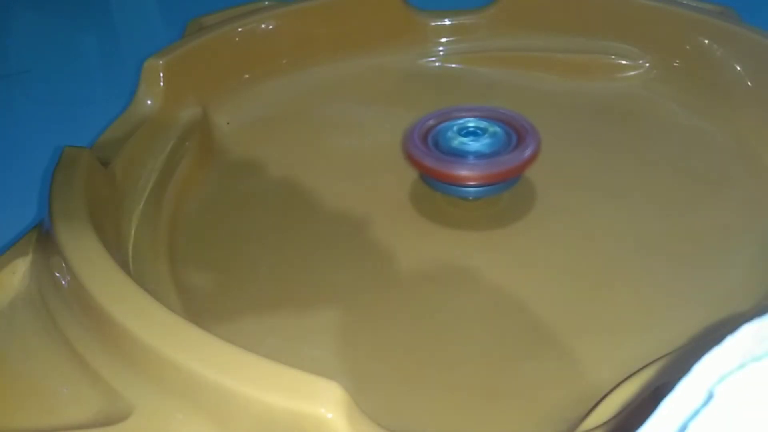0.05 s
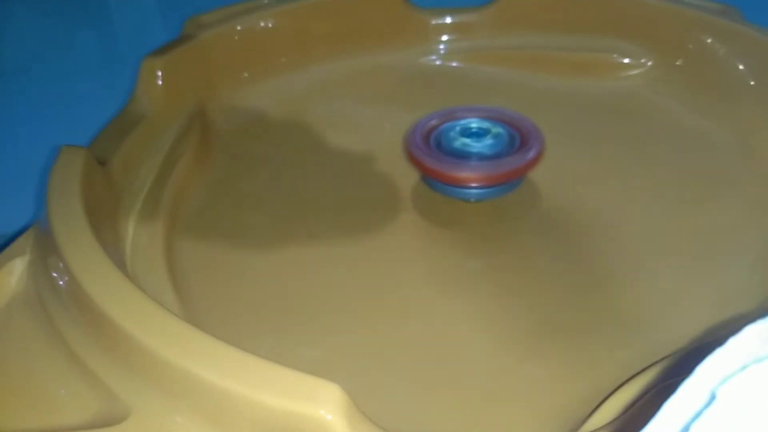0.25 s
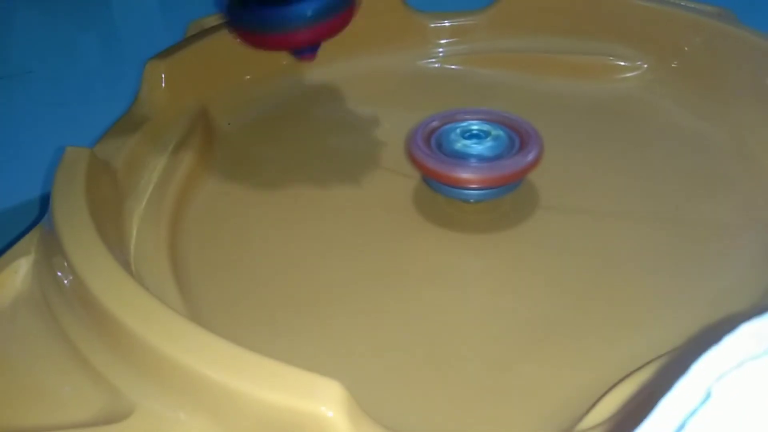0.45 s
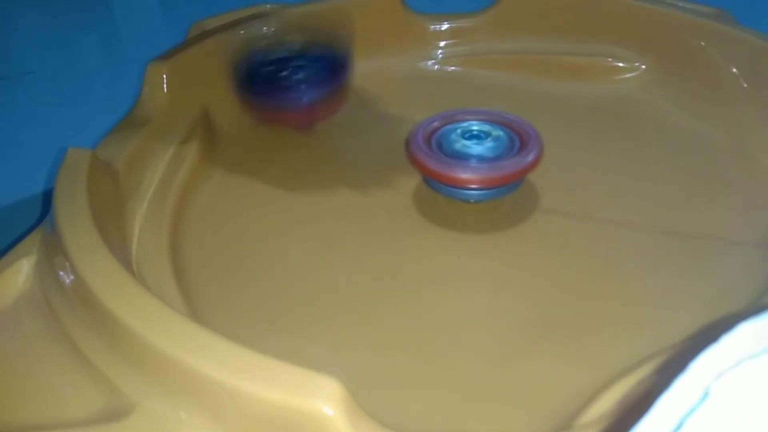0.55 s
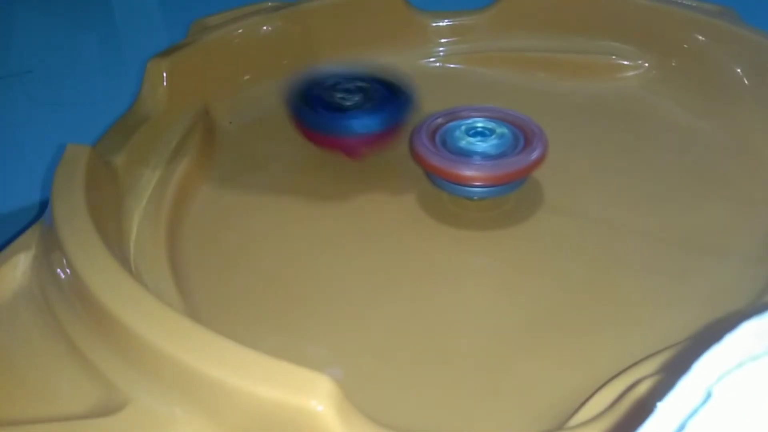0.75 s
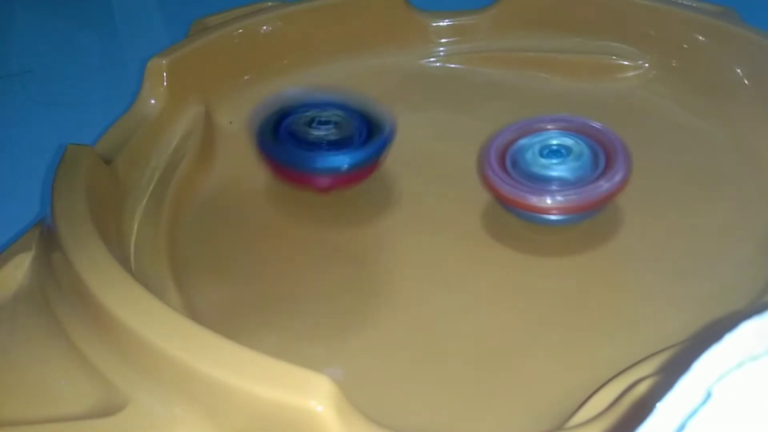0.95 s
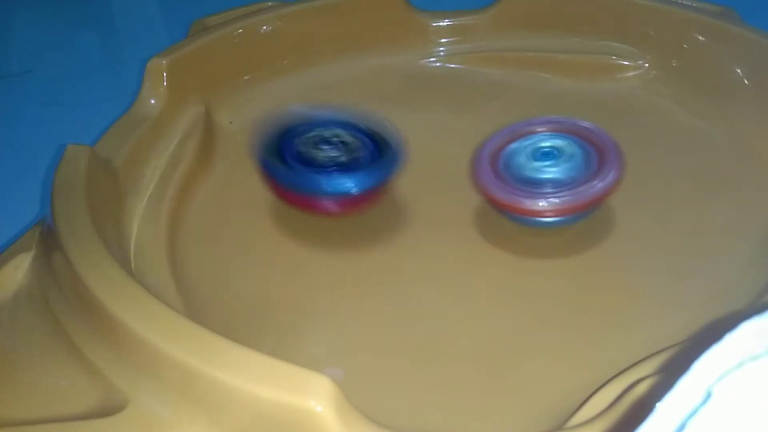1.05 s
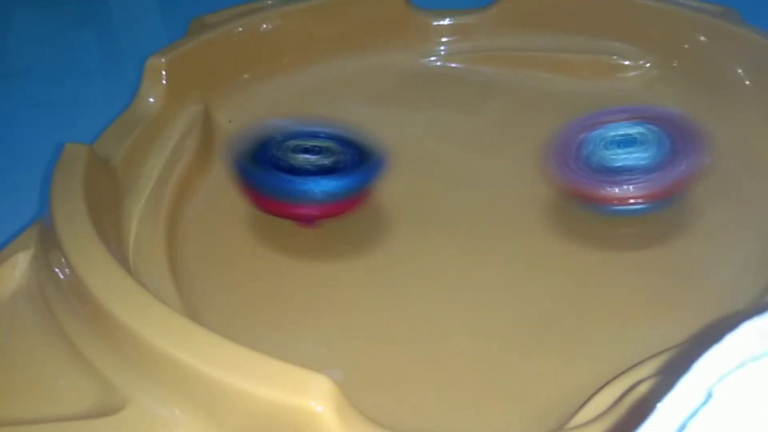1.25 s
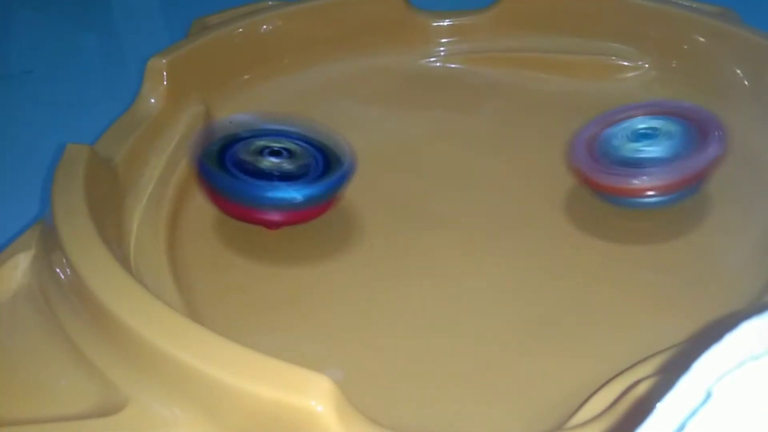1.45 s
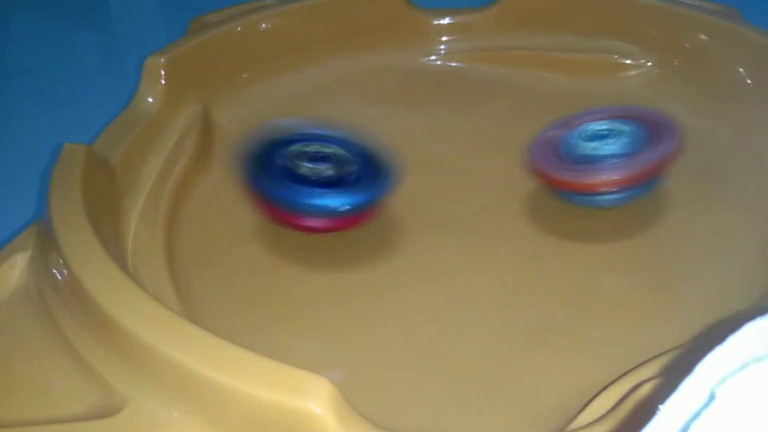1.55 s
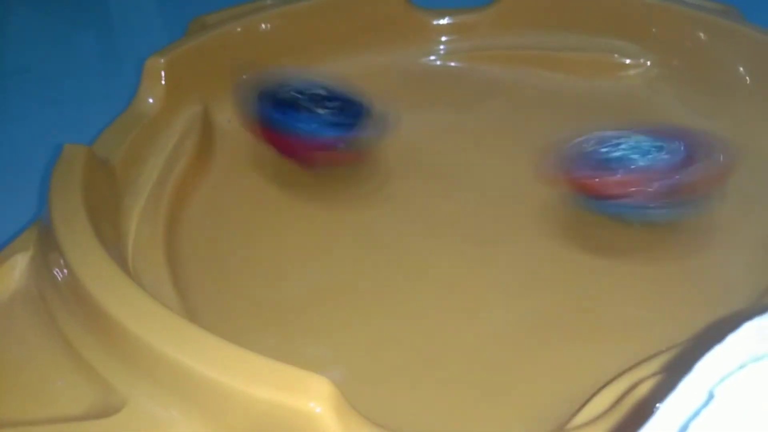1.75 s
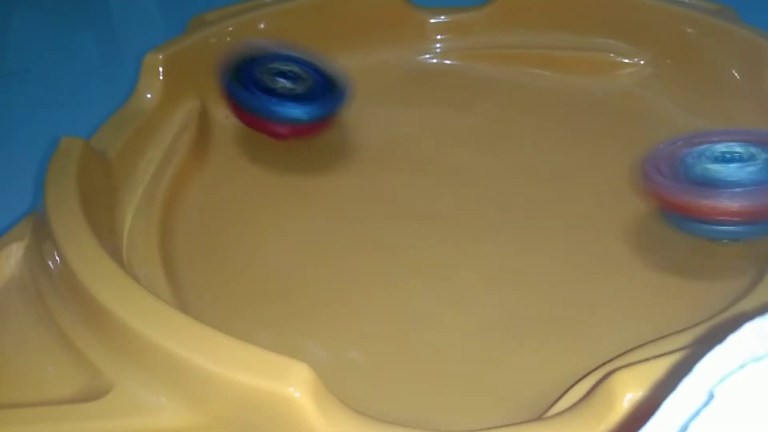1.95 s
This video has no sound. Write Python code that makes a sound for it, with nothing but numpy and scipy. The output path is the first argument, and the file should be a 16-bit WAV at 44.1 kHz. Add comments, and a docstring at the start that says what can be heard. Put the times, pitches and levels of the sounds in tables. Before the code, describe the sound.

Spinning tops clash in a plastic stadium after a ripcord whirr, with sharp metallic cracks and clatter

```python
"""A faint skitter, then the rising whirr of a ripcord that lets go of the second of two spinning tops.
It drops into a thin plastic stadium in a small live room and bounces: struck modes of shell, wall and bowl.
The tips skitter as noise pulsed once a turn; the metal rims clash three times as bursts with room echoes,
and the last two clashes leave a rim ringing in decaying modes. Then the struck top grazes the floor in
short rising scrapes and a top clatters against the plastic wall."""
import sys
import numpy as np
from scipy import signal
from scipy.fft import rfft, irfft
from scipy.io import wavfile
from scipy.ndimage import map_coordinates

SR = 44100
rng = np.random.default_rng(int(sys.argv[2]) if len(sys.argv) > 2 else 0)


def dump(signal):
    """Clip the signal to [-1, 1] and save it as 16-bit WAV at the path in sys.argv[1]."""
    limited = np.clip(np.atleast_2d(signal).T, -1, 1)
    pcm = np.round(limited * 32767).astype(np.int16)
    wavfile.write(sys.argv[1], SR, pcm)


N = 88200

# Background noise spectrum. Each row: frequency in Hz, level in dB.
BACKGROUND = [(30, 2), (150, -10), (1000, -27), (8000, 8), (15000, -15)]
BACKGROUND_DB = -65.5

# Tips on the floor. Each row: time in seconds, hiss level in dB, rumble level in dB.
SKITTER_LEVELS = [(0, -52.5, -88), (.07, -58, -93), (.38, -53, -52.5), (.53, -43, -45), (.72, -40, -46.5),
                  (.95, -44, -52.5), (1.1, -48.5, -44.5), (1.24, -65, -60), (1.28, -58, -52),
                  (1.5, -53, -48), (1.7, -48, -32.5), (1.84, -61, -49), (2, -54.5, -46)]
# Spectrum of the scraping tips. Each row: frequency in Hz, level in dB.
HISS_SPECTRUM = [(530, -47), (900, -49), (1180, -12), (1440, -12), (1780, -2), (2080, -4), (3320, 3),
                 (3870, 1), (7400, 1), (15000, -31.5)]
# Spectrum of the rumbling bowl. Each row: frequency in Hz, level in dB.
RUMBLE_SPECTRUM = [(24, -59), (40, -19.5), (124, 1.5), (302, -10.5), (443, -5), (650, -7.5), (907, -9),
                   (1170, -13), (1420, -12.5), (1800, -22.5), (3000, -94)]
# Level of the thin whine. Each row: time in seconds, level in dB.
WHINE_LEVELS = [(.03, -67), (.3, -60), (.42, -46), (.55, -62), (1.2, -78), (1.7, -70), (1.83, -63),
                (1.92, -76)]
SPIN_HZ, SPIN_SAG_HZ_PER_S, WHINE_HZ = 63, 4.06, 8460

# The pull of the ripcord. Each row: time in seconds, level in dB.
PULL_LEVELS = [(0, -100), (.075, -65.5), (.132, -38.5), (.236, -27), (.31, -28.5), (.38, -41), (.44, -39),
               (.5, -79)]
# Spectrum of the ripcord's rasp. Each row: frequency in Hz, level in dB.
RASP_SPECTRUM = [(120, -61), (314, -32.5), (700, -22), (1130, -11.5), (2060, -13), (2380, -4),
                 (4890, -10.5), (7420, -8.5), (15000, -45.5)]
# Pitch of the gear teeth as the cord speeds up. Each row: time in seconds, pitch in Hz.
GEAR_PITCH_CURVE = [(.05, 800), (.13, 1130), (.15, 1355), (.175, 1640), (.22, 2310), (.26, 2420),
                    (.4, 2360)]
# Resonances of the launcher's housing. Each row: frequency in Hz, level in dB.
HOUSING_MODES = [(1200, -8), (1690, -4), (2380, -0.5), (2800, -14), (3040, 4.5), (3800, 0.5)]
GEAR_LOUDEST_S, GEAR_SWELL_S = 0.17, 0.05

# Light plastic clicks of the launcher and the tips. Each row: start in seconds, level in dB.
CLICK_EVENTS = [(0.316, -14), (0.334, -18), (0.3518, -17), (.392, -18.5), (0.41, -24), (0.4838, -27),
                (0.491, -27.5), (0.705, -26.5), (0.8048, -33.5), (1.081, -28.5), (1.096, -27),
                (1.1541, -34), (1.26, -43.5), (1.275, -43), (1.3107, -46), (1.324, -39), (1.378, -38.5),
                (1.4274, -41.5), (1.461, -41.5), (1.5091, -36.5), (1.758, -38), (1.817, -42.5),
                (1.869, -45), (1.98, -47)]
# Spectrum of a click. Each row: frequency in Hz, level in dB.
CLICK_SPECTRUM = [(290, -69), (500, -34), (990, -14), (2070, -6), (2880, -1.5), (5230, -0.5), (5860, 0.5),
                  (8250, -2.5), (15000, -32)]

# A top strikes the stadium. Each row: start in seconds, shell level, clack level and thud level in dB.
KNOCK_EVENTS = [(0.384, -34.5, -23, -37), (0.39, -13, -26, -32), (0.41, -17.5, -35, -39.5),
                (0.423, -25, -34, -26.5), (0.483, -26.5, -31.5, -34), (0.4926, -22, -23.5, -44),
                (0.506, -29.5, -27, -22.5), (1.604, -31, -35, -32), (1.622, -50, -35, -47),
                (1.6552, -28, -14.5, -51), (1.664, -30.5, -15, -30), (1.6693, -31.5, -21.5, -34)]
# Modes of the thin shell. Each row: frequency in Hz, level in dB, t60 in seconds.
SHELL_MODES = [(206, -11.5, 0.12), (277.1, 0.5, 0.28), (332.7, -13.5, 0.33), (419.3, -3.5, 0.2),
               (458.5, -16, 0.33), (512.5, -5.5, 0.3), (539, -6, 0.21), (596.6, -0.5, 0.15),
               (654, -9.5, .17), (780, -3, 0.091), (911, -6, 0.14)]
# Spectrum of the shell's mass of short modes. Each row: frequency in Hz, level in dB.
SHELL_NOISE_SPECTRUM = [(40, -29), (150, 6.5), (500, 2.5), (900, -4.5), (1300, -9.5), (3000, -26.5),
                        (9000, -70)]
# Spectrum of a clack. Each row: frequency in Hz, level in dB.
CLACK_SPECTRUM = [(180, -67), (300, 1.5), (775, -4), (1000, -9), (1570, 5), (2200, -6), (2900, -5),
                  (4540, -8), (6070, -16.5), (7600, -8.5), (14000, -40)]
# Modes of the stiff stadium wall. Each row: frequency in Hz, level in dB, t60 in seconds.
WALL_MODES = [(327, -8.5, 0.37), (542.2, -12, 0.14), (785, 0, 0.088), (1555, -11, 0.13), (1786, -12, 0.073),
              (2594, -3.5, 0.064)]
# Modes of the whole bowl flexing. Each row: frequency in Hz, level in dB, t60 in seconds.
BOWL_MODES = [(92, -9, .2), (139, -2.5, .32)]

# Rim against rim. Each row: start in seconds, crack level in dB, crack t60 in seconds, room level in dB,
# stadium level in dB, thump level in dB, settled floor tone in Hz, floor tone level in dB.
CLASH_EVENTS = [(0.6106, -8, 0.057, -19.5, -36.5, -51, 790, -31),
                (0.974, -5, 0.012, -14, -27.5, -16, 576, -11.5),
                (1.524, -5.5, 0.032, -14, -27, -23, 795, -12.5)]
# Spectrum of the crack of the rims. Each row: frequency in Hz, level in dB.
CRACK_SPECTRUM = [(180, -31), (300, -38), (663, -11), (3870, -11), (4490, -1), (6360, -7), (7880, 6),
                  (9600, -7.5), (12300, -13), (15500, -25)]
# Spectrum of a tip slamming into the floor. Each row: frequency in Hz, level in dB.
SMACK_SPECTRUM = [(100, 7.5), (1000, -1.5), (7000, -17), (15000, -10)]
# Spectrum of the room's answer to a clash. Each row: frequency in Hz, level in dB.
CLASH_ROOM_SPECTRUM = [(200, -14), (800, -7), (1090, -18.5), (3950, -13), (4550, -3), (5060, -12.5),
                       (5980, -5), (8550, 2.5), (15500, -29.5)]
# First reflections of a clash from nearby walls. Each row: delay in seconds, level in dB.
WALL_REFLECTIONS = [(0.018, -5.5), (0.033, -2.5)]
ROOM_T60_S, ROOM_DELAY_S, ROOM_RISE_S = 0.24, 0.011, 0.0044

# Modes of the metal rim as the second clash sets it ringing. Each row: frequency in Hz, level in dB, t60 in
# seconds.
RIM_A_MODES = [(4226, -30, .4), (4355, -35, .3), (4581, -20.5, .28), (4646, -31, .4), (4700, -30, .3),
               (8080, -26, .25), (8220, -26, .24), (11990, -49, .55), (12360, -41, .58)]
# The same rim's modes, weighted differently, as the third clash sets it ringing. Each row: frequency in Hz,
# level in dB, t60 in seconds.
RIM_B_MODES = [(4240, -26, .34), (4344, -30.5, .5), (7628, -29, .28), (8436, -29, .34), (8730, -22, .18)]
RIM_BLUR = 0.1  # phase wander in radians

# A tilted top grazes the floor. Each row: centre in seconds, level in dB, pitch at the centre in Hz.
GRAZE_EVENTS = [(1.284, -51.5, 1440), (1.284, -48.5, 474), (1.281, -46, 880), (1.338, -46, 898),
                (1.381, -51, 2310), (1.384, -47.5, 960), (1.422, -49, 1433), (1.421, -48, 454.4),
                (1.602, -40, 1464), (1.628, -35, 1370)]
BAND_LIMIT_HZ = 15700


def amp(db):
    """Level law: decibels to an amplitude ratio."""
    return 10 ** (np.asarray(db) / 20)


def unit(x):
    """Normalisation of power: scale to rms 1."""
    return x / np.sqrt(np.mean(x ** 2) + 1e-20)


def clock():
    """Uniform sampling: the time of each sample in seconds."""
    return np.arange(N) / SR


def curves(rows):
    """Linear interpolation: one value per sample for each column after the time."""
    times, *columns = np.transpose(rows)
    return [np.interp(clock(), times, column) for column in columns]


def wobble(knots_per_s):
    """Band-limited fluctuation: a smooth random curve through knots at the given rate."""
    return map_coordinates(rng.standard_normal(N // 8), [clock() * knots_per_s], mode="wrap")


def colour(x, spectrum):
    """Linear filtering: weight the spectrum of x, interpolated on log frequency, at rms 1."""
    hz, db = np.transpose(spectrum)
    bins_hz = np.fft.rfftfreq(N, 1 / SR)
    gain = amp(np.interp(np.log(bins_hz + 1), np.log(hz), db))
    return unit(irfft(rfft(x) * gain, N))


def noise(spectrum):
    """Stationary random sound: white noise coloured by a spectrum."""
    return colour(rng.standard_normal(N), spectrum)


def burst(spectrum, envelope):
    """Transient noise: coloured after its envelope so that its edges stay within the spectrum."""
    raw = rng.standard_normal(N) * envelope
    return colour(raw, spectrum) * np.sqrt(np.mean(envelope ** 2))


def fade(start, t60, rise):
    """Damped response to a blow: quick rise, then exponential decay of 60 dB in t60 seconds."""
    t = np.maximum(clock() - start, 0)
    return (1 - np.exp(-t / rise)) * 1000 ** (-t / t60)


def ring(modes, start, rise, blur):
    """Modal superposition: decaying sines whose phases wander slightly."""
    out = np.zeros(N)
    for hz, db, t60 in modes:
        phase = 2 * np.pi * (hz * clock() + rng.random()) + blur * wobble(60)
        out += amp(db) * fade(start, t60, rise) * np.sin(phase)
    return out


def sing(hz, drift_per_s):
    """Friction-driven resonance: a carrier, fixed or moving, under two random quadrature envelopes."""
    phase = 2 * np.pi * np.cumsum(hz * np.ones(N)) / SR
    return unit(wobble(drift_per_s) * np.sin(phase) + wobble(drift_per_s) * np.cos(phase))


def glide(start, from_hz, to_hz, settle_s):
    """Exponential relaxation of pitch: a sine slides from one frequency and settles on another."""
    t = np.maximum(clock() - start, 0)
    slide_cycles = (from_hz - to_hz) * settle_s * (1 - np.exp(-t / settle_s))
    return np.sin(2 * np.pi * (to_hz * t + slide_cycles))


def echo(start, spectrum):
    """Diffuse reverberation: the room answers a short blow with delayed, decaying noise."""
    return noise(spectrum) * fade(start + ROOM_DELAY_S, ROOM_T60_S, ROOM_RISE_S)


def background():
    """Stationary random sound: a steady faint noise under the scene."""
    return amp(BACKGROUND_DB) * noise(BACKGROUND)


def turns(rate_hz, sharp):
    """Periodic modulation: one bump for each turn, at rms 1."""
    return unit(np.exp(sharp * np.cos(2 * np.pi * np.cumsum(rate_hz) / SR)))


def skitter(modes_db=-6, drift_per_s=28):
    """Rotating friction: tips scrape once a turn and keep the bowl rumbling, with a thin whine."""
    hiss_db, rumble_db = curves(SKITTER_LEVELS)
    whine_db, = curves(WHINE_LEVELS)
    spin_hz = (SPIN_HZ - SPIN_SAG_HZ_PER_S * clock()) * (1 + 0.12 * wobble(29.9))
    sway_db = 1.1 * wobble(35.09)  # shared by hiss and rumble
    hiss_level = amp(hiss_db + sway_db + 0.71 * wobble(600))
    hiss = noise(HISS_SPECTRUM) * turns(spin_hz, sharp=0.38) * hiss_level
    # Halved dB levels even out the shell modes under steady friction.
    hum = unit(sum(amp(db / 2) * sing(hz, drift_per_s) for hz, db, t60 in SHELL_MODES))
    rumble = unit(noise(RUMBLE_SPECTRUM) + amp(modes_db) * hum) * amp(rumble_db + sway_db)
    whine = amp(whine_db) * sing(WHINE_HZ * (1 + 0.0055 * wobble(8)), drift_per_s=40)
    return hiss + rumble + whine


def launcher(gear_db=-10, housing_db=-8):
    """Gear meshing and resonance: the cord rasps through the housing as the gear whirrs up in pitch."""
    level_db, = curves(PULL_LEVELS)
    pitch_hz, = curves(GEAR_PITCH_CURVE)
    swell = np.exp(-((clock() - GEAR_LOUDEST_S) / GEAR_SWELL_S) ** 2)
    gear = amp(gear_db) * sing(pitch_hz, drift_per_s=220) * swell
    housing = unit(sum(amp(db) * sing(hz, drift_per_s=58.3) for hz, db in HOUSING_MODES))
    rasp = unit(burst(RASP_SPECTRUM, amp(1.6 * wobble(900))))
    whirr = unit(rasp + gear + amp(housing_db) * housing)
    return amp(level_db + 1.5 * wobble(88.7)) * whirr


def clicks(t60=0.028, room_db=-13):
    """Impulsive contact: small dry snaps of plastic with a little room."""
    out = np.zeros(N)
    for start, db in CLICK_EVENTS:
        snap = burst(CLICK_SPECTRUM, fade(start, t60, 0.00026))
        room = echo(start - 0.008, CLICK_SPECTRUM)  # shortens the room delay
        out += amp(db) * (snap + amp(room_db) * room)
    return out


def shell(start, modes_db=-4, boom_db=-1, boom_t60=0.22):
    """Modal density: the thin bowl booms in clear modes over a mass of short ones."""
    modes = ring(SHELL_MODES, start, rise=0.00022, blur=0.74)
    boom = noise(SHELL_NOISE_SPECTRUM) * fade(start, boom_t60, 0.00027)
    return amp(modes_db) * modes + amp(boom_db) * boom


def knocks(clack_t60=0.041, room_db=-16, wall_db=-5):
    """Impact excitation: a top lands, bounces or hits the wall, rousing shell, wall and bowl."""
    out = np.zeros(N)
    for start, shell_db, clack_db, thud_db in KNOCK_EVENTS:
        clack = noise(CLACK_SPECTRUM) * fade(start, clack_t60, 0.00023)
        clack += amp(room_db) * echo(start, CLACK_SPECTRUM)
        clack += amp(wall_db) * ring(WALL_MODES, start, rise=0.00062, blur=0.55)
        thud = ring(BOWL_MODES, start, rise=0.0011, blur=0.56)
        out += amp(shell_db) * shell(start) + amp(clack_db) * clack + amp(thud_db) * thud
    return out


def clash_room(start, early_db=-8, early_t60=0.25, reflection_t60=0.053):
    """Early and late reflection: bright noise at once, from nearby walls, then as a diffuse echo."""
    early = amp(early_db) * noise(CLASH_ROOM_SPECTRUM) * fade(start, early_t60, 0.001)
    arrivals = sum(amp(db) * fade(start + delay, reflection_t60, 0.001) for delay, db in WALL_REFLECTIONS)
    walls = noise(CLASH_ROOM_SPECTRUM) * arrivals
    return early + walls + echo(start, CLASH_ROOM_SPECTRUM)


def floor_thump(start, from_hz=220, to_hz=46, settle_s=0.0047, t60=0.077, smack_db=8, smack_t60=0.0057):
    """Impulsive load on a plate: the shoved floor thumps with falling pitch under a noisy smack."""
    thump = glide(start, from_hz, to_hz, settle_s) * fade(start, t60, 0.00021)
    return thump + amp(smack_db) * burst(SMACK_SPECTRUM, fade(start, smack_t60, 0.0001))


def floor_tone(start, hz, bend=0.7, bend_s=0.01684, t60=0.18):
    """Pitch relaxation: the shoved floor sounds a tone that rises to its settled frequency."""
    return glide(start, bend * hz, hz, bend_s) * fade(start, t60, rise=0.05)


def clashes():
    """Hard collision: rims crack together, shove the stadium floor and fill the room."""
    out = np.zeros(N)
    for start, db, t60, room_db, shell_db, thump_db, tone_hz, tone_db in CLASH_EVENTS:
        out += amp(db) * noise(CRACK_SPECTRUM) * fade(start, t60, 0.00028)
        out += amp(room_db + 0.92 * wobble(500)) * clash_room(start)
        out += amp(shell_db) * shell(start)
        out += amp(tone_db) * floor_tone(start, tone_hz)
        out += amp(thump_db) * floor_thump(start)
    return out


def rims(rise=0.023):
    """Free vibration: the second and third clashes each set the metal rim ringing, its modes weighted
    differently."""
    first = ring(RIM_A_MODES, CLASH_EVENTS[1][0], rise, RIM_BLUR)
    second = ring(RIM_B_MODES, CLASH_EVENTS[2][0], rise, RIM_BLUR)
    return first + second


def grazes(width_s=0.0088, rise_per_s=2, drift_per_s=130):
    """Sliding friction: short hollow scrapes, each rising a little, as the struck top wobbles."""
    out = np.zeros(N)
    for centre, db, hz in GRAZE_EVENTS:
        t = clock() - centre
        pitch_hz = hz * (1 + rise_per_s * t + 0.025 * wobble(400))
        out += amp(db) * sing(pitch_hz, drift_per_s) * np.exp(-(t / width_s) ** 2)
    return out


def scene():
    """Linear superposition: all sources add in one channel."""
    struck = clicks() + knocks() + clashes() + rims()
    return (background() + skitter() + launcher() + struck + grazes())[None]


def record(dry, top=0.65, low_cut_hz=40):
    """Band limiting and saturation: shed deep bass, round off high peaks, cut the extreme treble."""
    high_pass = signal.butter(2, low_cut_hz, "highpass", fs=SR, output="sos")
    lean = signal.sosfilt(high_pass, dry)
    held = lean / (1 + np.abs(lean / top) ** 4) ** (1 / 4)
    band = 1 / (1 + (np.fft.rfftfreq(2 * N, 1 / SR) / BAND_LIMIT_HZ) ** 160)
    return irfft(rfft(held, 2 * N) * band)[:, :N]


dry = scene()
out = record(dry)
dump(out)
```